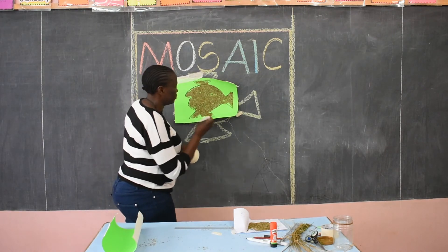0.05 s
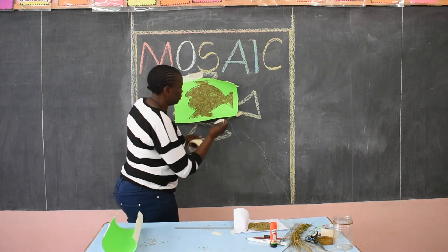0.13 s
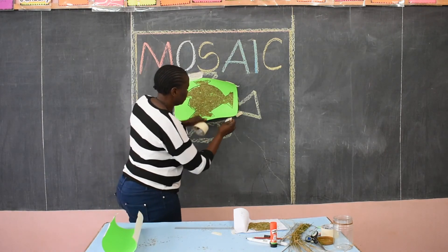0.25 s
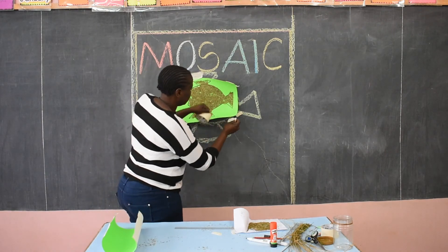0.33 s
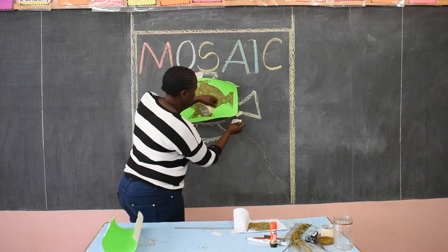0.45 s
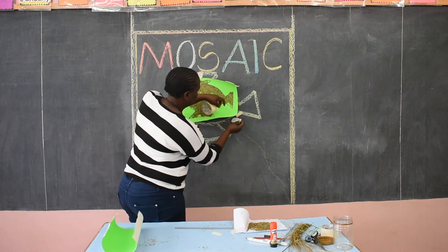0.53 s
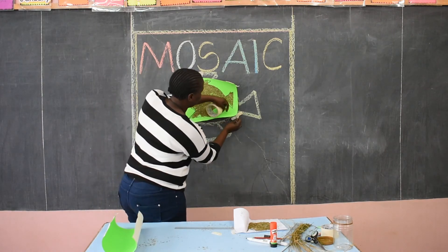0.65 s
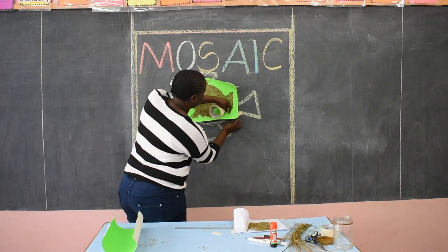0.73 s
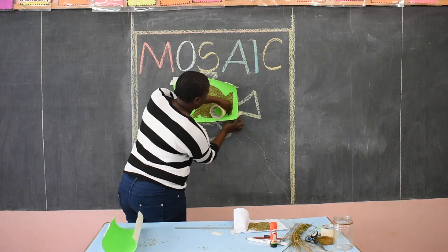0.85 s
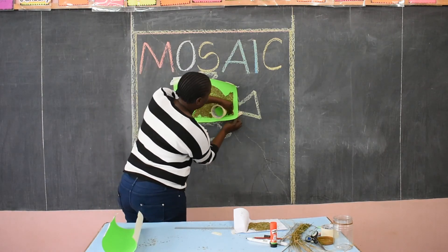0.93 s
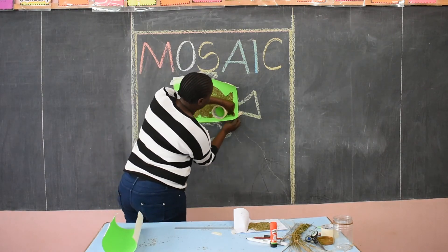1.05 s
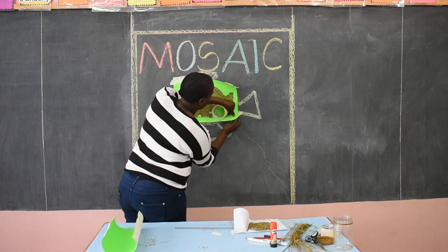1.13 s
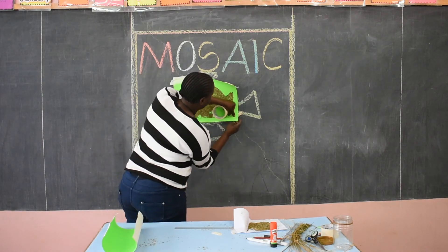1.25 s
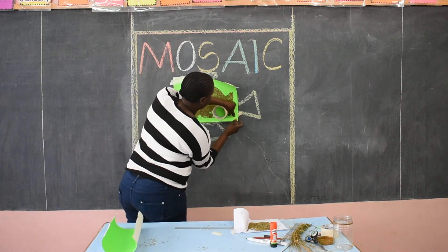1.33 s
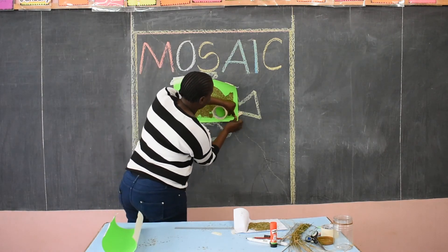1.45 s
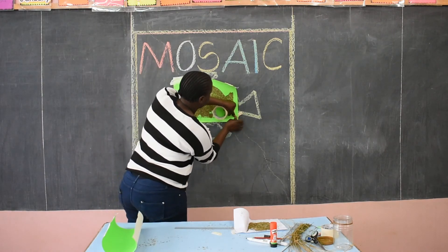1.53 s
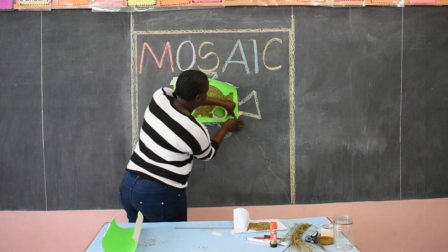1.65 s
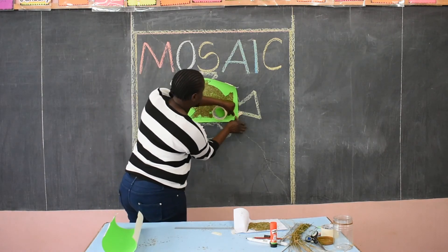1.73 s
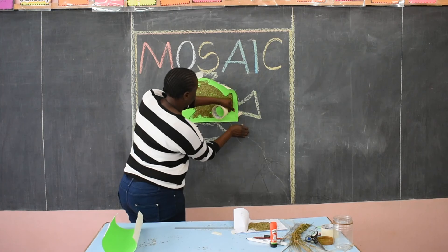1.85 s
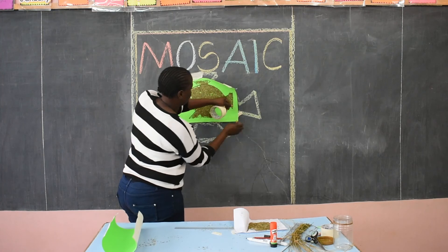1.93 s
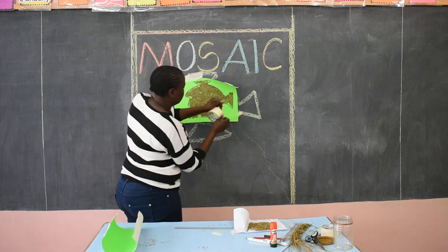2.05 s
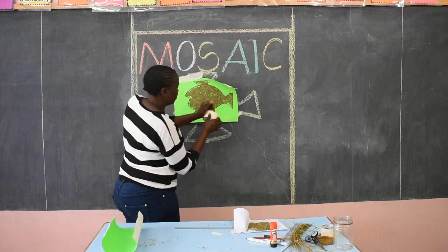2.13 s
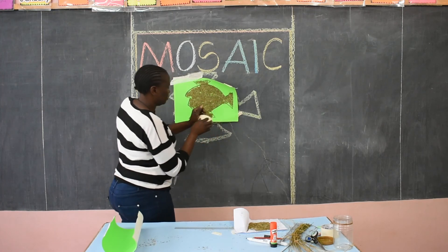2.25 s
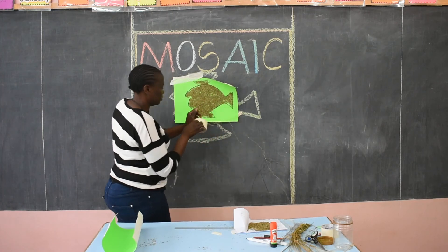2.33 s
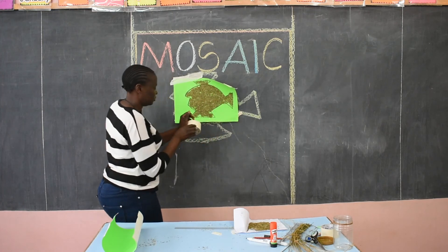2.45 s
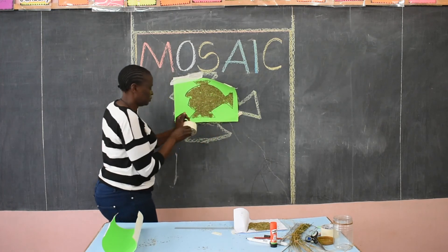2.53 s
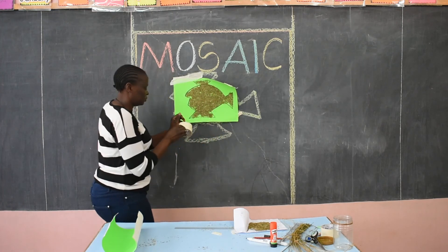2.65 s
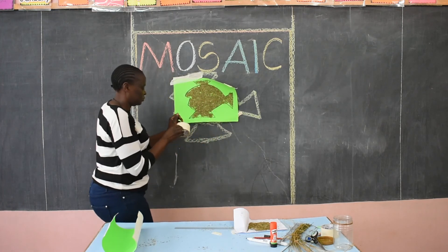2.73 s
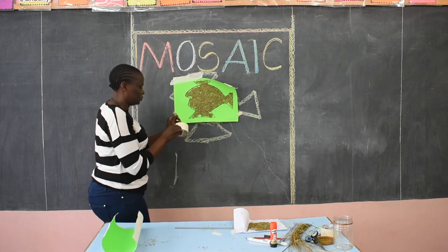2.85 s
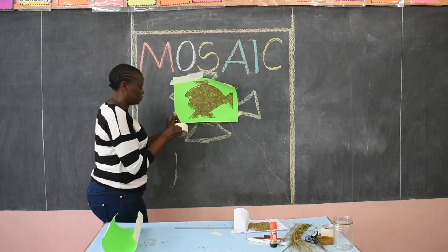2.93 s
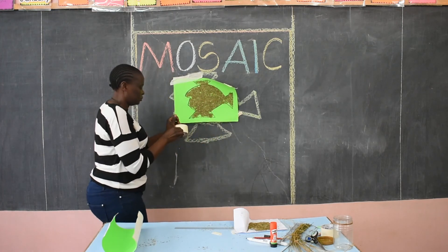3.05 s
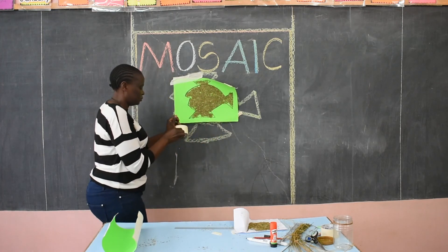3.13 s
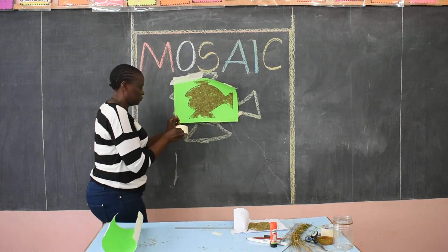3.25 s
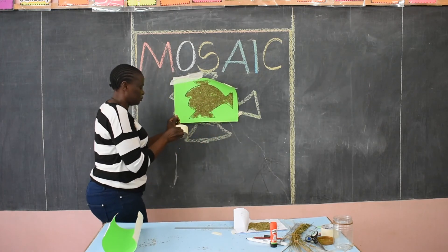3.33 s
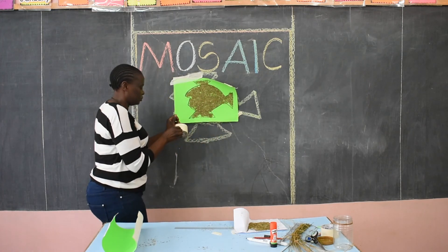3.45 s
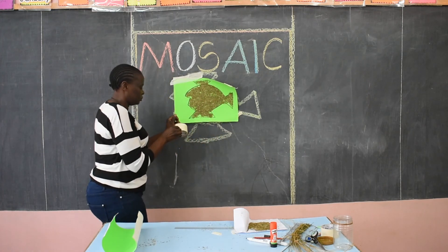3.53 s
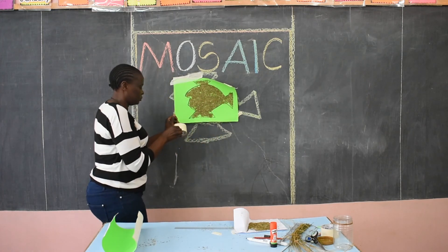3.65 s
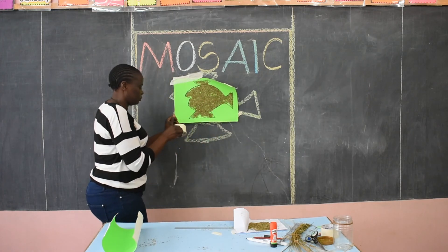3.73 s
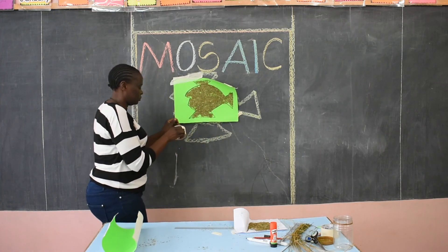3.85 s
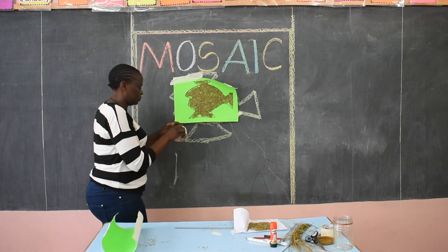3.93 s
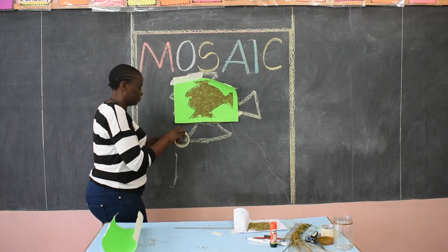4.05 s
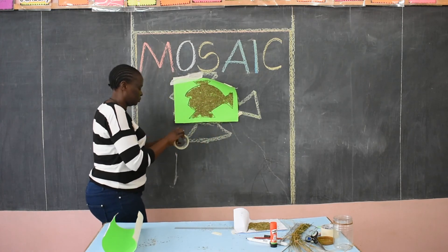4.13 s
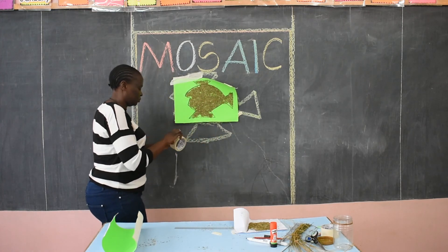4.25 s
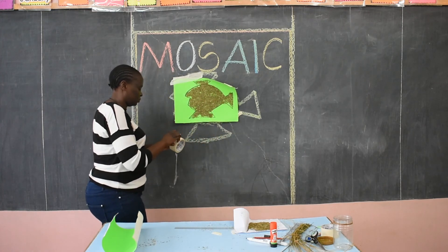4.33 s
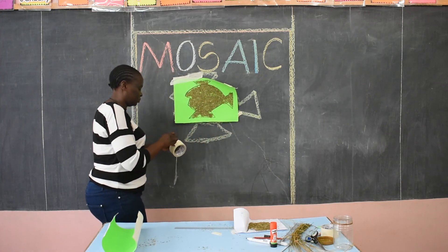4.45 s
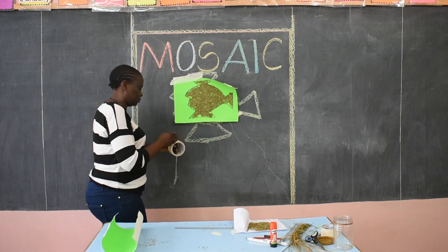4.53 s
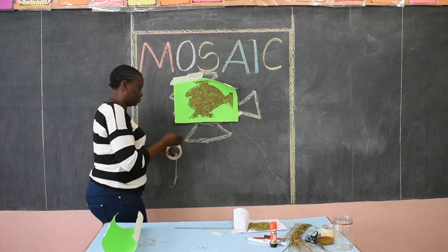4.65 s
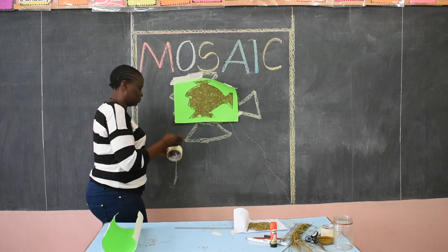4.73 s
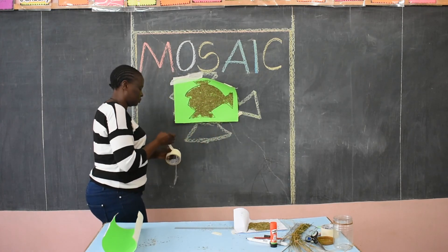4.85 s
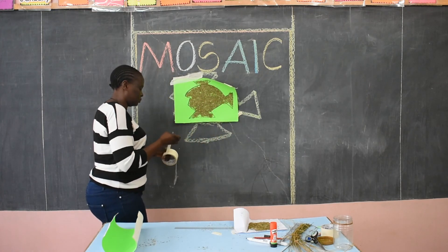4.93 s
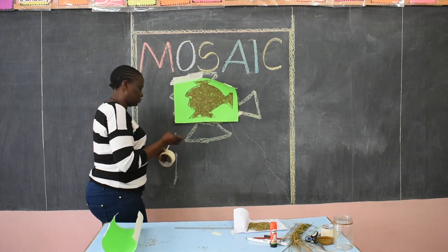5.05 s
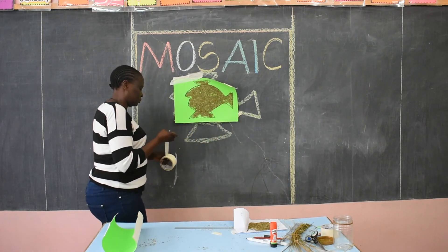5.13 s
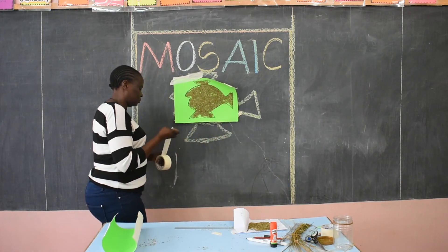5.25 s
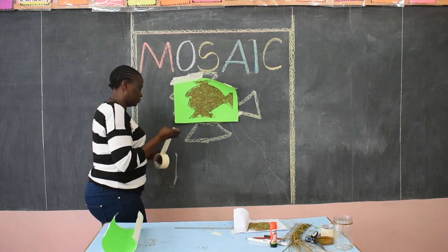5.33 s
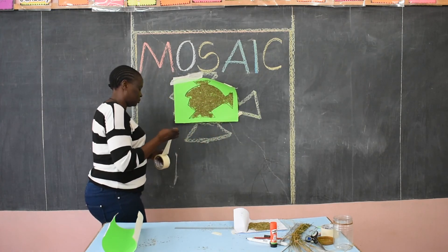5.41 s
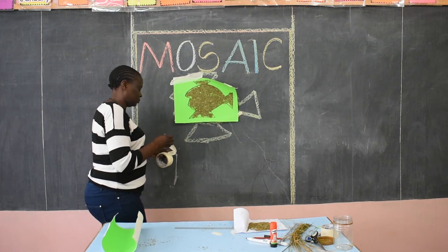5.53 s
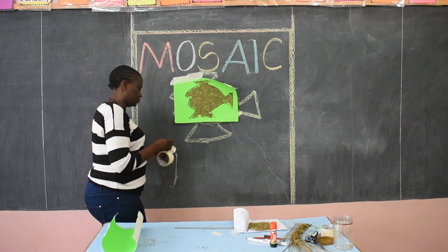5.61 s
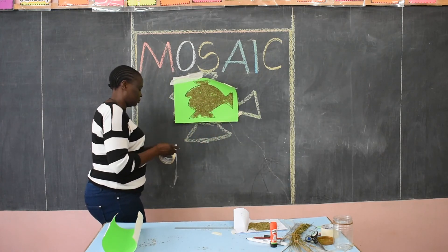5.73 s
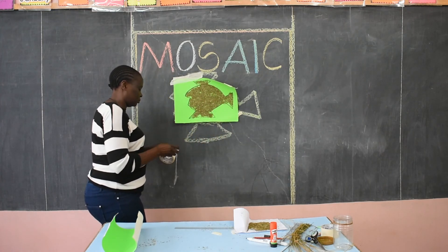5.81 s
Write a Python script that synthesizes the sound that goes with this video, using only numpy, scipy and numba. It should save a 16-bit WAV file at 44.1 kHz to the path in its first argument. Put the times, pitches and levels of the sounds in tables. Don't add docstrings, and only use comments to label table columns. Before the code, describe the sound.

A bare, hard-walled classroom heard in mono from several metres away, over soft hiss, low electrical hum and a distant engine that surges gently, mostly in the first four seconds. At 0 s a short sticky peel ends, then nail ticks and a light rub at 0.2 s. From 0.6 to 0.9 s come small crackles and a firmer rub. Hollow tape-roll taps and rubbing follow from 0.97 s, with sharp knocks at 1.16, 1.27 and hardest at 1.49 s, fading into faint ticks by 2 s. It is nearly quiet until 3.8 s, with a soft scrape at 2.8 and a faint rising bird chirp at 3.4. A dull slap hits the board at 3.84 s. Small peels at 4.2 s lead to dense, bright rips at 4.4, 4.8 and 5.1 s, the last falling in pitch with loud snaps. Little rubs and ticks end it from 5.7 s.

```python
import sys
import numpy as np
from scipy import signal
from scipy.fft import rfft, irfft
from scipy.io import wavfile
from scipy.ndimage import uniform_filter1d
from numba import njit

SR = 44100
rng = np.random.default_rng(int(sys.argv[2]) if len(sys.argv) > 2 else 0)


def rack_gain(trim_db):
    fader = np.asarray(trim_db, float)
    return 10 ** (fader / 20)


def master_out(mix):
    frames = np.transpose(np.atleast_2d(mix))
    ceiling = np.clip(frames, -1, 1)
    pcm = np.round(ceiling * 32767).astype(np.int16)
    wavfile.write(sys.argv[1], SR, pcm)


N = 259308
LEAD = 4410
M = N + LEAD
TIME = (np.arange(M) - LEAD) / SR


def level(x, db):
    return x * rack_gain(db) / np.sqrt(np.mean(x ** 2))


@njit
def svf(x, hz, width):
    y, b, l = np.empty(len(x)), 0., 0.
    for i in range(len(x)):
        g, k = np.tan(np.pi * hz[i] / SR), width[i] / hz[i]
        v = (b + g * (x[i] - l)) / (1 + g * (g + k))
        b, l, y[i] = 2 * v - b, l + 2 * g * v, k * v
    return y


def band(x, hz, width_hz):
    hz = np.clip(hz, 20, .45 * SR) * np.ones(len(x))
    width_hz = width_hz * np.ones(len(x))
    return svf(svf(x, hz, width_hz), hz, width_hz)


def walk(rate_hz):
    hold = int(SR / rate_hz)
    steps = rng.standard_normal(M // 50 + 1)
    return uniform_filter1d(np.repeat(steps, hold)[:M], hold)


def along(table, hz):
    table_hz, value = np.transpose(table)
    return np.interp(np.log(hz), np.log(table_hz), value)


def air():
    # pitch_hz, level_db (per Hz)
    air_colour = [(20, -15.5), (156, -3.5), (297, -9), (420, -9), (800, -15), (2500, -19.5), (10000, -28.5),
                  (16000, -39.5)]
    hz = np.maximum(np.fft.rfftfreq(M, 1 / SR), 1)
    spectrum = rfft(rng.standard_normal(M)) * rack_gain(along(air_colour, hz))
    return level(irfft(spectrum, M), -52) * rack_gain(0.75 * walk(2.0))


def mains_hum():
    # pitch_hz, level_db (rms)
    partials = [(100, -92), (200.5, -63.5), (300.5, -64), (401, -76.5), (601, -77), (701.5, -64.5),
                (803, -71)]
    waver_db = 1.5
    hum = sum(rack_gain(db + waver_db * walk(6.5)) * np.sin(2 * np.pi * (hz * TIME + rng.random()))
              for hz, db in partials)
    return np.sqrt(2) * hum


def engine():
    # middle_s, half_length_s, pitch_hz, level_db
    surges = [
        (.7, 0.27, 143, -55.5),
        (1.316, 0.25, 150, -60.5),
        (1.744, 0.22, 150, -59),
        (2.226, 0.21, 167.5, -56.5),
        (3.305, 0.32, 141.5, -58),
        (3.95, .3, 150, -63),
        (4.85, 0.23, 153, -65.5),
        (5.642, 0.23, 144.6, -66.5),
    ]
    idle_db = -71.5
    s, half_s, hz, db = np.transpose(surges)[:, :, None]
    surge = rack_gain(db) * np.exp(-((TIME - s) / half_s) ** 4)
    near = surge + 1e-9 * np.exp(-np.abs(TIME - s) / .05)
    pitch_hz = uniform_filter1d((near * hz).sum(axis=0) / near.sum(axis=0), size=2000)
    phase = 2 * np.pi * np.cumsum(pitch_hz * (1 + 0.01 * walk(23.24))) / SR
    return np.sqrt(2) * (surge.sum(axis=0) + rack_gain(idle_db)) * np.sin(phase)


def bird():
    # time_s, pitch_hz, level_db
    chirp = [
        (3.349, 3760, -78),
        (3.371, 3780, -70),
        (3.42, 3945, -71),
        (3.45, 4200, -72),
        (3.469, 4200, -93),
    ]
    s, hz, db = np.transpose(chirp)
    phase = 2 * np.pi * np.cumsum(np.interp(TIME, s, hz)) / SR
    return rack_gain(np.interp(TIME, s, db, left=-200, right=-200)) * np.sin(phase)


def struck(hits):
    overtone, overtone_db, length = 2.18, -12.5, 4096
    out, blow = np.zeros(M + length), np.eye(1, length)[0]
    crack = band(blow, 7700, 9900)
    crack /= crack.max()
    for s, db, hz, share, crack_db in hits:
        width_hz = np.clip(share, .1, 3) * hz
        ring = band(blow, hz, width_hz)
        ring += rack_gain(overtone_db) * band(blow, overtone * hz, overtone * width_hz)
        at = int(s * SR) + LEAD
        out[at:at + length] += rack_gain(db) * (ring / np.abs(ring).max() + rack_gain(crack_db) * crack)
    return out[:M]


def board_knocks():
    # start_s, peak_db, ring_hz, ring_width_share (of ring_hz)
    knocks = [(0.723, -43, 390, 0.18), (0.739, -39.5, 416, 0.31), (1.27, -29.5, 720, 0.55),
              (2.315, -46, 310, 0.56), (2.795, -39, 867, 0.4), (2.801, -38, 970, 0.2),
              (3.844, -24, 780, 0.81), (3.859, -32, 485, 0.44), (3.86, -47.5, 74, .4),
              (3.2017, -31.5, 2300, 1.16), (1.162, -10, 2390, 0.51), (1.2, -25.5, 1220, 0.71),
              (3.839, -32, 440, 0.93), (1.51, -27.5, 1190, 0.79), (2.806, -34, 920, 0.28)]
    return struck([(*knock, -30) for knock in knocks])


def roll_taps():
    # start_s, peak_db
    taps = [
        (0.9687, -20),
        (1.27, -9),
        (1.4399, -21),
        (1.4484, -46),
        (1.487, -5.5),
        (1.772, -30),
        (1.8216, -26),
    ]
    ring_hz, width_share, crack_db = 2420, 0.41, -11.5
    return struck([(*tap, ring_hz, width_share, crack_db) for tap in taps])


def nail_ticks():
    # start_s, peak_db, ring_hz
    nails = [(0.16, -30, 5070), (0.2096, -20, 4670), (0.215, -18.5, 7350), (0.22, -22, 8200),
             (0.6074, -33.5, 7200), (.683, -36, 7500), (0.7653, -37, 8000), (.828, -26, 13000),
             (1.2712, -19, 8500), (1.284, -19, 7500), (0.8274, -30, 9540), (0.8317, -20, 8450),
             (0.8374, -18.5, 3500), (1.1634, -17.5, 3450), (1.4814, -22.5, 3000), (1.6168, -35, 8500),
             (1.696, -34, 3150), (1.7668, -23, 3800), (1.8215, -20.5, 5600), (1.861, -29.5, 9400),
             (1.956, -27, 7930), (1.9568, -34, 3500), (3.1995, -35, 3350), (3.8452, -24.5, 2770),
             (4.708, -29, 13000), (4.74, -29, 13500), (4.758, -28, 13000), (5.687, -34, 7180),
             (5.7205, -30, 5600), (5.7895, -17, 3060)]
    width_share, crack_db = 0.56, -23.5
    return struck([(*nail, width_share, crack_db) for nail in nails])


def glue_snaps():
    # start_s, peak_db, ring_hz
    snaps = [
        (4.338, -21, 9130),
        (4.345, -28, 4500),
        (5.1144, -2, 7640),
        (5.1457, -2, 4830),
        (5.185, -12, 3860),
        (5.1953, -6, 3050),
        (5.233, -1.5, 2970),
        (5.377, -10.5, 6740),
        (5.401, -19, 5890),
    ]
    width_share, crack_db = 0.6, -9.5
    return struck([(*snap, width_share, crack_db) for snap in snaps])


def gesture(curve, edge_db, edge_rise, body_db, body_rise, broad_db):
    firm_db = -20
    s, db, hz = np.transpose(curve)
    weaker_db = firm_db - db
    body_hz = 926 * 2 ** (-weaker_db / 48)
    return np.c_[s, db, edge_db + edge_rise * weaker_db, body_db + body_rise * weaker_db,
                 hz, body_hz, broad_db + 0 * s]


def pulls():
    # time_s, level_db, strip_hz
    rips = [
        [(4.372, -39, 3010), (4.39, -23.5, 3100), (4.402, -21, 4560), (4.422, -11.5, 5050), (4.5, -34, 4660),
         (4.55, -35, 4200), (4.618, -49, 4000), (4.69, -56, 3965)],
        [(4.772, -27, 4170), (4.78, -16.5, 4000), (4.808, -13.5, 3900), (4.868, -18.5, 4320),
         (4.91, -14.5, 4250)],
        [(5.075, -33, 4430), (5.079, -24, 4480), (5.129, -13.5, 4170), (5.229, -18, 3540), (5.27, -17.5, 3420)],
    ]
    # edge_db, edge_rise_db_per_db, body_db, body_rise_db_per_db, rustle_db
    rip_kinds = [
        (-5, 0.16, -22.5, 0.73, 8.2),
        (-3.5, .4, -16.5, 0.79, 17),
        (-2, .6, -12.5, 0.24, 7),
    ]
    # start_s, length_s, level_db, end_level_db, strip_hz
    peels = [(0.0, 0.032, -24.5, -34, 4150), (.605, 0.068, -46, -45, 3500), (.68, 0.036, -40.5, -42, 4260),
             (.79, .035, -39, -43, 3570), (.985, 0.052, -42, -52, 3000), (1.455, .025, -46, -44, 5000),
             (5.719, .026, -37.5, -38, 4830), (5.8, 0.023, -30, -40, 3150), (1.69, 0.078, -44, -56, 2920),
             (1.86, 0.19, -54, -57.5, 3380), (4.262, 0.023, -29, -46, 3200),
             (4.312, .059, -38, -31.5, 4200)]
    rubs = [(.205, 0.041, -39.5, -51, 5000), (.3, .11, -52.5, -56.5, 3800), (.43, 0.18, -55, -63, 2960),
            (.83, 0.02, -27.5, -26.5, 3150), (.849, 0.057, -22, -40, 3173), (1.05, .1, -54, -39.5, 2390),
            (1.175, 0.024, -32.5, -29, 2500), (1.207, 0.042, -29.5, -28.5, 2460),
            (1.281, 0.051, -24.5, -44, 2650), (1.79, 0.022, -42, -41.5, 3400),
            (1.826, .033, -34.5, -56, 3340), (4.701, 0.071, -32, -37, 4030),
            (5.378, 0.037, -30, -31.5, 5080), (5.746, 0.045, -37.5, -30.5, 3430),
            (.74, 0.033, -41, -40, 4200), (5.5, .1, -46, -53, 3300), (5.828, 0.044, -37, -36, 3260)]
    lifts = [
        (.768, 0.018, -44, -49, 5000),
        (4.015, 0.054, -49.5, -60, 3000),
        (4.205, 0.014, -42.5, -30, 6000),
        (4.224, 0.039, -31, -39, 4170),
        (1.51, 0.14, -58, -65, 6000),
        (4.295, .015, -42, -36, 5900),
    ]
    scrapes = [
        (.72, 0.0197, -50, -48, 3000),
        (2.45, 0.24, -89, -62, 2500),
        (2.652, .13, -65.5, -55, 2300),
        (2.785, 0.09, -46.5, -61, 1900),
    ]
    slaps = [
        (3.842, 0.06, -24.5, -37, 2207),
    ]
    kinds = [
        (peels, (-6.5, 0.0579, -19.5, 0.0116, 14.5)),
        (rubs, (-16.5, 0.0231, -16.5, 0.1179, 8)),
        (lifts, (2.5, 0.1, -18.5, 0.0155, 19)),
        (scrapes, (-7, 0.03, 1.5, 0.22, 13)),
        (slaps, (-32, 0.2, -4.5, -0.11, 5)),
    ]
    attack_s, attack_db = 0.0089, 2
    moves = [gesture(rip, *kind) for rip, kind in zip(rips, rip_kinds)]
    for table, kind in kinds:
        for s, length_s, db, end_db, hz in table:
            end_s = s + max(length_s, 2 * attack_s)
            curve = [(s, db - attack_db, hz), (s + attack_s, db, hz), (end_s, end_db, hz)]
            moves.append(gesture(curve, *kind))
    return sorted(moves, key=lambda move: move[0, 0])


def glue_slips():
    slips_per_s, spread_db, chatter_db = 9000, 2.1, 1.5
    slipped = rng.random(M) < slips_per_s / SR
    size = np.minimum(rng.exponential(size=M), 4)
    sign = rng.standard_normal(M)
    return slipped * rack_gain(spread_db * size + chatter_db * walk(180)) * sign


def tape():
    slips, moves = glue_slips(), pulls()
    rows = np.concatenate(moves)
    rows[:, 0] = np.maximum.accumulate(rows[:, 0])
    db, edge_db, body_db, hz, body_hz, broad_db = (
        np.interp(TIME, rows[:, 0], column) for column in rows.T[1:])
    pulled = sum((TIME < p[-1][0]) * (TIME >= (p[0][0] or -0.05)) for p in moves) > 0
    grip = uniform_filter1d(1. * pulled, size=90)

    ring = level(band(slips, hz, 0.85 * hz) / np.sqrt(hz), 0)
    rustle = level(band(slips, np.sqrt(3300 * hz), 8500), 0)
    strip = (ring + rack_gain(broad_db) * rustle) / (1 + rack_gain(broad_db))
    sizzle = level(band(slips, 14770, 7800), -10)
    edge = level(band(slips, 9800, 10000), 0) - sizzle
    board = level(band(slips, body_hz, 2.44 * body_hz) / np.sqrt(body_hz), 0)
    roll = level(band(slips, 219, 240), -11.0)
    body = board - roll
    return grip * rack_gain(db - 5.5) * (level(strip, 0) - rack_gain(edge_db) * edge - rack_gain(body_db) * body)


def answer(stretch):
    # delay_s, level_db
    echoes = [(.0029, -1), (.0058, -9), (.0093, -4), (.0128, -8), (.015, -9), (.021, -10), (.035, -10),
              (.045, -8)]
    # pitch_hz, t60_s
    room_t60 = [(150, 1), (500, 0.8), (1200, 0.64), (2400, 0.48), (4500, 0.49), (8000, 0.42), (14000, 0.32)]
    tail_db, build_s, wall_dull = .8, .011, 3
    t = np.arange(SR) / SR
    tail = sum(band(rng.standard_normal(SR), hz, hz / 1.6) * rack_gain(-60 * t / along(room_t60, hz))
               for hz in 100 * 2 ** np.arange(0, 7.6, .5))
    tail *= 1 - np.exp(-(t / build_s) ** 2)
    out = rack_gain(tail_db) * tail / np.sqrt(np.sum(tail ** 2))
    out[0] = 1
    for s, db in echoes:
        dull = np.clip(wall_dull * np.sqrt(s), 0, .9) ** np.arange(24)
        out[int(s * SR * stretch):][:24] += rack_gain(db) * dull / dull.sum()
    return out


def room(moving, still):
    turn = np.pi * 7 * TIME
    shares = [np.cos(turn - k * np.pi / 3) ** 2 / 1.5 for k in range(3)]
    places = [moving * shares[0] + still, moving * shares[1], moving * shares[2]]
    stretches = 1, 1.13, .84
    return sum(signal.fftconvolve(x, answer(stretch))[:M] for x, stretch in zip(places, stretches))


def scene():
    still = bird() + board_knocks() + roll_taps() + nail_ticks() + glue_snaps()
    mono = air() + mains_hum() + engine() + room(tape(), still)
    return np.tile(mono[LEAD:], (2, 1))


def band_limit(x):
    return signal.sosfilt(signal.butter(12, 16490, fs=SR, output="sos"), x)


def record(dry):
    low_cut = signal.butter(2, 56, "highpass", fs=SR, output="sos")
    top_cut = signal.ellip(8, .3, 70, 16250, fs=SR, output="sos")
    mic = signal.sosfilt(low_cut, dry)
    rounded = 1.066 * np.tanh(mic / 1.14)
    return band_limit(signal.sosfilt(top_cut, rounded))


dry = scene()
out = record(dry)
master_out(out)
```